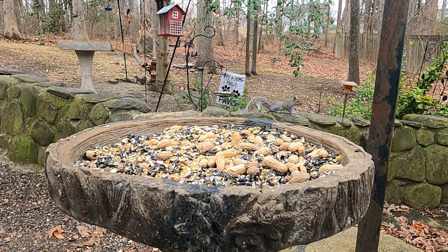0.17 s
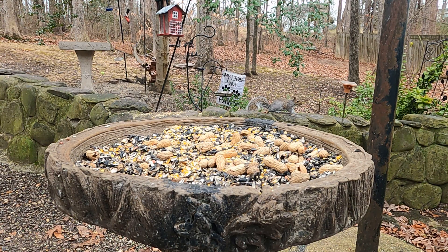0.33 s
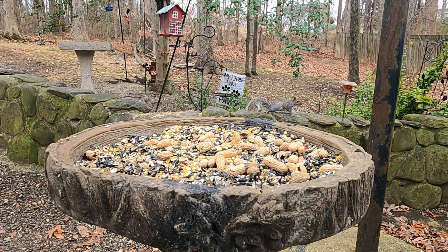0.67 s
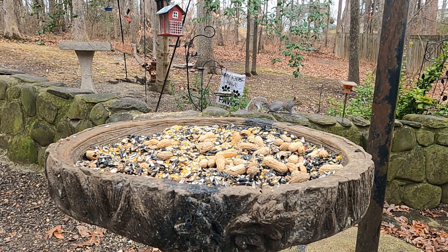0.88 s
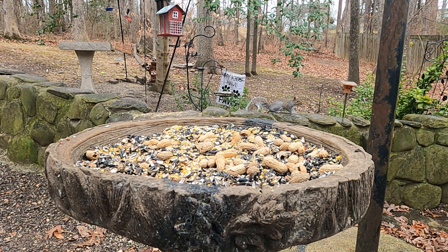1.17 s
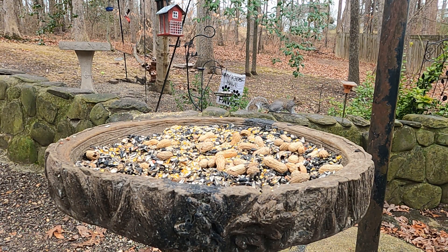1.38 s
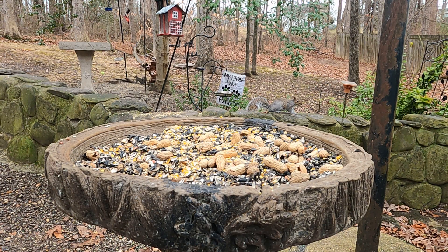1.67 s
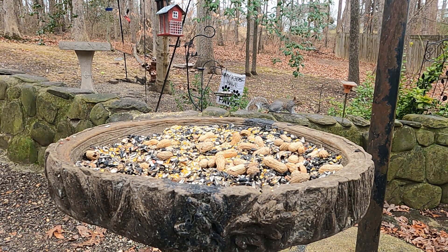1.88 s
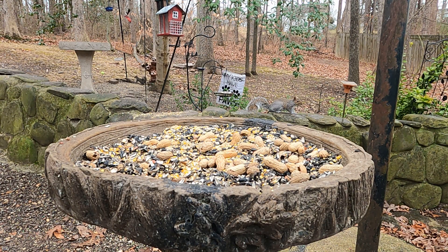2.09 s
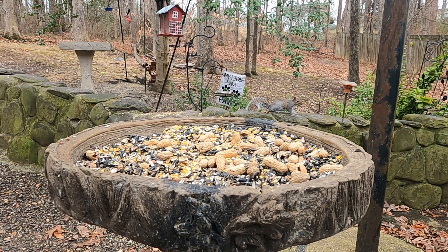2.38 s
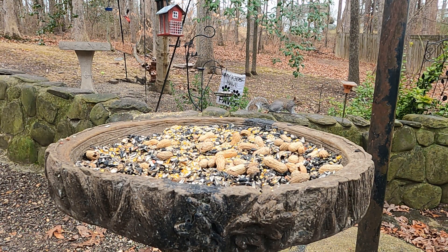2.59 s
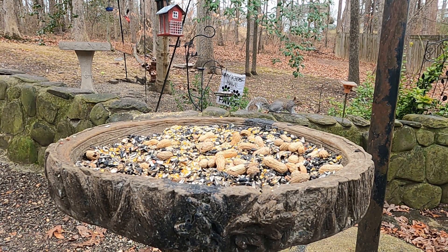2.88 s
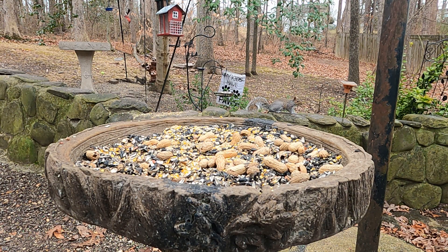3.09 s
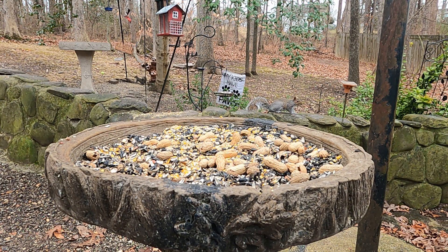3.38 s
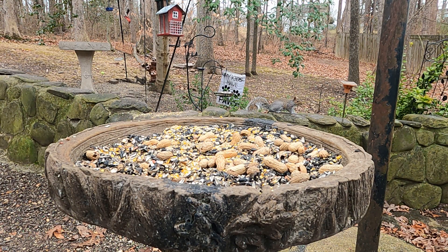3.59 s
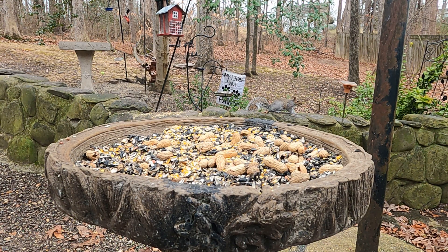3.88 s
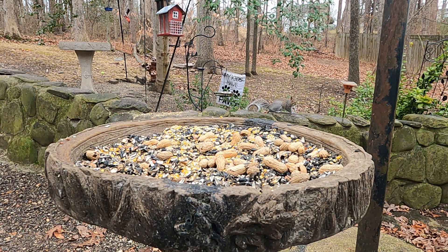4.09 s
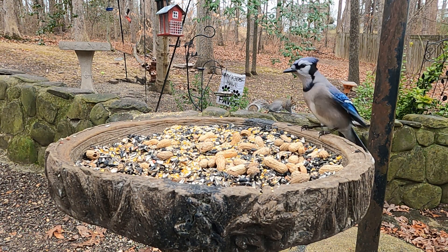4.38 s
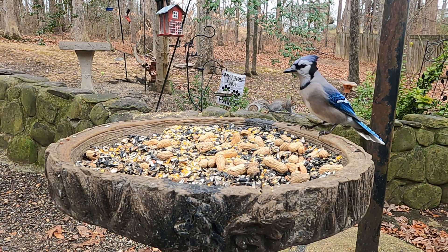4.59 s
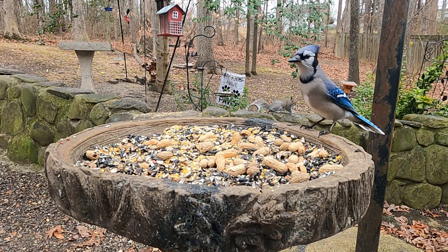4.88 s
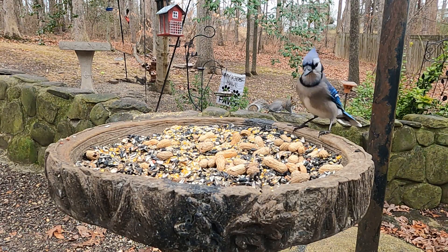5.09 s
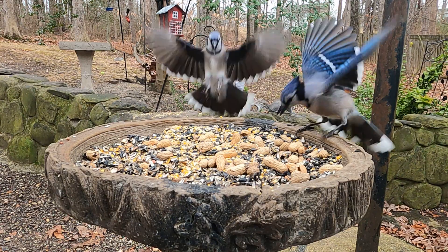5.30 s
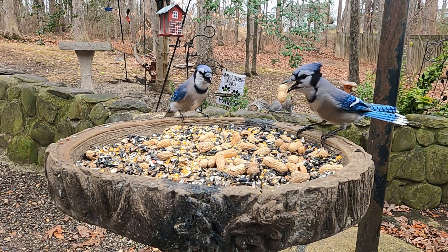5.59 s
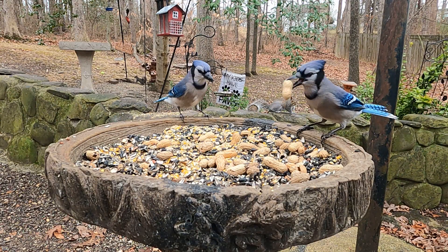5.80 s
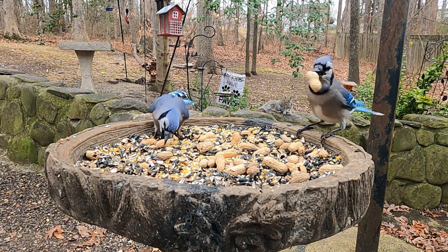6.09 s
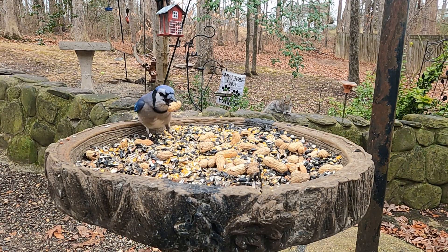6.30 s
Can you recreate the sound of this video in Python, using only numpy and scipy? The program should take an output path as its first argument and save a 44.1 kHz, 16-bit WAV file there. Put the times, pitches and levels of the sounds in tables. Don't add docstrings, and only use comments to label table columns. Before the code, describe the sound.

Low road rumble, far echoing harsh jay calls, soft knocks and claw ticks, then two loud near blue jay screams and a wing-flap departure.

```python
import sys
import numpy as np
from scipy import signal
from scipy.fft import rfft, irfft, next_fast_len
from scipy.io import wavfile
from scipy.ndimage import uniform_filter1d

SR = 44100
rng = np.random.default_rng(int(sys.argv[2]) if len(sys.argv) > 2 else 0)


def wav_out(sig):
    wavfile.write(sys.argv[1], SR, np.round(np.clip(np.atleast_2d(sig).T, -1, 1) * 32767).astype(np.int16))


def rack_gain(trim_db):
    fader = np.asarray(trim_db, float)
    return 10 ** (fader / 20)


N = 284381


def evened(x):
    return x / np.sqrt(np.mean(x ** 2) + 1e-20)


def read(points, hz):
    f, value = np.transpose(points)
    return np.interp(np.log(np.abs(hz) + 1), np.log(f + 1), value)


def wander(count, size):
    return evened(uniform_filter1d(uniform_filter1d(rng.standard_normal(count), size), size))


def coloured(x, points):
    size = next_fast_len(x.shape[-1], True)
    gain = rack_gain(read(points, np.fft.rfftfreq(size, 1 / SR)))
    return irfft(rfft(x, size) * gain, size)[..., :x.shape[-1]]


def add(mix, s, sound, pan_db=0., angle=0.):
    # (frequency [Hz], lead [rad])
    port_lead = [(0, 0.68), (3010, -0.81), (6120, -0.37), (7580, -0.98), (11700, -0.2), (12900, -0.2),
                 (13200, 0.2), (15200, -0.6)]
    x = np.pad(sound, (32, 32 + len(sound) % 2))
    turn = np.exp(.5j * angle * read(port_lead, np.fft.rfftfreq(len(x), 1 / SR)))
    pair = irfft(rfft(x) * np.array([turn, 1 / turn]), len(x))
    pair *= rack_gain(np.array([[pan_db], [-pan_db]]) / 2)
    part = mix[:, max(round(s * SR) - 32, 0):][:, :len(x)]
    part += pair[:, :part.shape[1]]


def woods(x, gap_s, depth=0.81, size=SR, stir=.4):
    # (frequency [Hz], t60 [s])
    trunk_decay = [(200, 1.5), (2000, 1.2), (3300, 0.91), (4500, 0.89), (7000, 0.74), (14000, 0.49)]
    taps_lr = np.zeros((2, size))
    at = np.arange(0, size - 20, 20) + rng.integers(0, 20, (2, (size - 1) // 20))
    np.put_along_axis(taps_lr, at, rng.choice([-1., 1.], at.shape), 1)
    taps_lr[1] = .5 * taps_lr[0] + 1.2 * taps_lr[1]
    hz, t, z = signal.stft(taps_lr, SR, nperseg=256)
    decay = rack_gain(-60 * t / depth / read(trunk_decay, hz)[:, None])
    tail = signal.istft(z * decay, SR, nperseg=256)[1]
    tail /= np.linalg.norm(tail, axis=1)[:, None]
    tail = np.pad(tail, ((0, 0), (round(gap_s * SR), 0)))
    stirred = x.mean(0) * (.92 + stir * wander(N, size=110))
    return signal.oaconvolve(stirred[None], tail, axes=1)[:, :N]


def traffic():
    # (frequency [Hz], density [dB per Hz])
    road_colour = [(12, -39), (24, -4.5), (50, 0.5), (80, -1), (124, -6), (160, -13), (484, -26.5),
                   (1390, -24.5), (2220, -34), (2550, -39), (2850, -41), (3460, -48.5), (4690, -55.5),
                   (7510, -55), (8160, -71.5), (10500, -76), (15000, -92)]
    # (frequency [Hz], left-right likeness [-1 to 1])
    likeness = [(60, 1), (180, 0.93), (550, 0.8), (1650, 0.78), (4970, 0.14), (15000, 0.99)]
    # (time [s], level [dB])
    swell = [(0.0, -54.5), (.6, -54), (1.2, -53.5), (4.4, -51.5), (5.25, -50.5), (5.55, -42.5), (5.9, -50),
             (6.45, -43.5)]
    hum_hz, hum_db = 119, -50.5
    rumble_db, gust_db = 7.5, 1.8
    truck_s, truck_db, truck_db_per_s = 1.1, 3.5, 2.1

    frames, hz = N // 512 + 5, np.fft.rfftfreq(2048, 1 / SR)
    a, b, c, d, patches = rng.standard_normal((frames, 1025, 5)).T
    patches = evened(uniform_filter1d(uniform_filter1d(patches, 20, 0), 8, 1))
    same = np.clip(read(likeness, hz), -1, 1)[:, None]
    left = a + 1j * b
    right = same * left + np.sqrt(1 - same ** 2) * (c + 1j * d)
    z = np.array([left, right]) * rack_gain(read(road_colour, hz)[:, None] + 1.72 * patches)
    road = signal.istft(z, nperseg=2048, noverlap=1536)[1][:, :N]

    t = np.arange(N) / SR
    hum = np.sin(2 * np.pi * np.cumsum(hum_hz + 2.13 * wander(N, size=2500)) / SR)
    hum *= rack_gain(hum_db + 3 * wander(N, size=3000))
    rumble = signal.filtfilt(*signal.butter(2, 150, fs=SR), road)
    drone = signal.filtfilt(*signal.butter(2, 450, fs=SR), road) - rumble
    truck = rack_gain(truck_db - truck_db_per_s * abs(t - truck_s)) - 1
    mixed = evened(road - rumble + truck * drone)
    mixed += rack_gain(rumble_db + gust_db * wander(N, size=6000)) * evened(rumble)
    return rack_gain(np.interp(t, *np.transpose(swell)) + 1.5) * mixed + hum


def bursts(rows):
    t = np.arange(0, N / SR, .001)
    gain = np.zeros(len(t))
    for s, rise, hold, fall, db in rows:
        climb = np.maximum((s + rise - t) / rise, 0)
        decay = np.maximum((t - s - rise - hold) / max(fall, .005), 0)
        gain += rack_gain(db - 20 * climb - 20 * decay) * (t >= s)
    return np.interp(np.arange(N) / SR, t, gain)


def rustle():
    # (start [s], rise [s], hold [s], time to fall 20 dB [s], level [dB])
    leaf_bursts = [(0.0, .02, .005, 1.2, -82.5), (.57, .04, .02, 10, -90.5),
                   (3.585, 0.013, 0.0092, 0.08, -73), (4.0, 0.048, 0.012, 0, -84),
                   (4.18, .01, 0.037, 1, -80.5), (4.2, 0.28, .01, 0.06, -68.5),
                   (4.35, 0.015, .008, 0.04, -72), (4.476, 0.0032, 0.0079, 0, -56.5),
                   (4.395, .02, 0.0069, -0.03, -68.5), (4.44, 0.017, 0.0056, -0.22, -77),
                   (4.8, 0.045, 0.27, -0.3, -79.5), (5.1, 0.047, 0.021, 1.2, -76.5),
                   (6.249, 0.0028, .006, 0, -48.5), (6.27, .01, 0.27, 2, -60.5)]
    # (start [s], rise [s], hold [s], time to fall 20 dB [s], level [dB])
    wing_draughts = [
        (5.22, 0.15, 0.1, 0.35, -25.5),
        (6.22, 0.18, .05, .1, -28.5),
    ]
    # (frequency [Hz], density [dB per Hz])
    feather_colour = [(1180, -16.5), (2000, -7), (2600, -7.5), (2900, -9.5), (7080, -10), (11900, -22.5),
                      (15000, -34.5)]
    clumps = rack_gain(2.2 * wander(N, size=40) + 2.5 * wander(N, size=700))
    grains = rng.standard_normal((2, N)) * clumps
    grains[1] = 0.38 * grains[0] + 0.55 * grains[1]
    crackle = evened(coloured(grains, feather_colour))
    draught = signal.lfilter(*signal.butter(3, [22, 90], "band", fs=SR), rng.standard_normal(N))
    return rack_gain(9.5) * bursts(leaf_bursts) * crackle + bursts(wing_draughts) * evened(draught)


def small_birds():
    # (start [s], length [s], start pitch [Hz], end pitch [Hz], level [dB])
    chips = [(0.0, .03, 7950, 7750, -75), (0.14, 0.012, 5820, 7300, -51.5), (0.148, .012, 7900, 8700, -66),
             (0.299, 0.072, 7200, 7630, -67.5), (0.777, 0.0055, 8700, 7400, -60.5),
             (1.168, 0.13, 7240, 7600, -69), (1.277, 0.037, 1990, 2000, -54.5),
             (3.926, 0.061, 8500, 7760, -79), (4.018, 0.049, 1910, 1995, -66),
             (4.18, .1, 5900, 7830, -70.5), (4.63, 0.12, 2700, 2503, -61), (4.953, 0.11, 8600, 7180, -64.5)]
    waver = 0.022
    mix = np.zeros((2, N))
    for s, length, start_hz, end_hz, db in chips:
        u = np.linspace(0, 1, round(length * SR))
        glide = end_hz + (start_hz - end_hz) * (1 - u) ** 3.8
        hz = glide + waver * end_hz * wander(len(u), size=24)
        whistle = np.sin(2 * np.pi * np.cumsum(hz) / SR)
        add(mix, s, rack_gain(db) * whistle * np.sin(np.pi * u ** 0.87))
    return rack_gain(1.5) * mix + rack_gain(1.0) * woods(mix, 0.0018, stir=.8)


def taps():
    # (time [s], peak [dB], centre [Hz], ring t60 [s], left-right [dB])
    ticks = [(0.6194, -63, 4540, 0.035, 0.0), (0.7294, -69, 5660, 0.035, -6),
             (0.8275, -60.5, 7670, 0.032, 1.0), (0.9194, -74, 5600, 0.035, 0.5),
             (1.2311, -59.5, 7340, 0.038, 10), (3.597, -60, 6640, 0.032, -3), (3.7554, -58, 5760, 0.25, -1),
             (3.7878, -42, 4160, 0.041, -3), (4.0494, -71, 7520, 0.035, -1.5),
             (4.3814, -47, 4630, 0.038, -9.5), (4.4107, -45, 5950, 0.04, -6),
             (4.476, -44.5, 6100, 0.018, -9.5), (4.482, -45, 9000, .02, -4.5),
             (4.518, -51, 7000, 0.012, -1.5), (4.5808, -48.5, 8000, 0.012, -6),
             (4.8584, -60, 5900, 0.035, 0.5), (5.0994, -65, 7320, 0.032, 2),
             (5.5754, -24.5, 5980, 0.027, 0.5), (6.2535, -33.5, 6030, 0.045, -3),
             (6.2674, -49, 5480, 0.03, 1.0), (6.2783, -53, 7720, 0.036, -1.5),
             (6.3124, -37, 5470, 0.025, -2)]
    # (time [s], peak [dB], centre [Hz], ring t60 [s], left-right [dB])
    knocks = [(0.754, -37.5, 288, 0.063, 0), (0.753, -38, 1080, 0.02, 2), (0.826, -35, 720, 0.032, 2),
              (0.828, -39, 1190, 0.028, 2), (0.833, -35, 308, 0.053, 0), (1.094, -44, 904, 0.05, 7),
              (1.171, -41.5, 1000, 0.028, 17), (1.17, -37, 304, 0.027, 12), (1.182, -30.5, 151, 0.051, 3),
              (1.185, -31.5, 285, 0.068, -4), (2.009, -48.5, 1150, 0.04, 20), (2.012, -36, 384, 0.021, 4),
              (2.079, -35, 390, 0.04, 7), (2.088, -41.5, 508, 0.047, 6), (2.097, -36, 306, 0.041, 4.5),
              (2.142, -41, 703, 0.029, 15), (4.477, -42, 1200, 0.059, -3), (4.482, -45.5, 1880, 0.03, -1),
              (4.476, -42.5, 300, 0.07, 1), (4.622, -41, 281, 0.073, -1), (5.577, -29, 2010, 0.018, -3),
              (6.265, -33, 1296, 0.027, -1), (6.278, -33.5, 1096, 0.026, -4),
              (6.351, -28, 231, 0.059, -2.5), (6.356, -38, 400, 0.057, -1), (4.42, -41, 403, 0.055, -4)]
    # (frequency [Hz], level [dB], t60 [s])
    hook_modes = [(4463, -7, 0.36), (5600, -14, .06), (6480, 0, 0.2), (7500, -4, 0.18), (11700, -8, 0.17),
                  (12300, -9, 0.18), (13200, -10, .06)]
    hook_s, hook_db, hook_rattle = 3.788, -56, .6

    mix, t = np.zeros((2, N)), np.arange(4000) / SR
    rise = 1 - np.exp(-t / 0.00045)
    for s, db, hz, t60, pan_db in ticks:
        band = signal.butter(2, [hz / 2.7, min(hz * 1.7, .4 * SR)], "band", fs=SR)
        noise = rng.standard_normal(len(t)) * rise * rack_gain(-60 * t / max(t60, .005))
        burst = signal.lfilter(*band, noise)
        add(mix, s, rack_gain(db - 9.0) * burst / np.sqrt(np.mean(burst[:150] ** 2)), pan_db)

    for s, db, hz, t60, pan_db in knocks:
        decay = rack_gain(db - 60 * t / max(t60, .005))
        add(mix, s, decay * (1 - np.exp(-t * hz * 1.7)) * np.sin(2 * np.pi * hz * t), pan_db)

    t = np.arange(12000) / SR
    ring = sum(rack_gain(db - 60 * t / t60) * np.sin(2 * np.pi * hz * t) for hz, db, t60 in hook_modes)
    rattle = .85 + hook_rattle * wander(len(t), size=60)
    add(mix, hook_s, rack_gain(hook_db) * (1 - np.exp(-t / 0.0046)) * rattle * ring)
    near_echo = woods(mix, 0.0018, depth=0.18, size=SR // 3)
    return mix + rack_gain(-10.5) * woods(mix, 0.008) + rack_gain(-7.0) * near_echo


def mouth(t, hz, db, grip, beak, rough, edge_s, join_s=-1.):
    onset, close = np.exp((t[0] - t) / edge_s[0]), np.exp((t - t[-1]) / edge_s[1])
    joined = np.clip((t - t[0] - join_s) / .008 + .5, 0, 1)
    low_grip = np.linspace(*grip, len(t)) * joined
    opening = beak[1] - beak[0] * onset - beak[2] * close
    roughness = rough[1] + rough[0] * onset + rough[2] * close
    return np.transpose([t, hz, db, low_grip, opening, roughness])


def jay(rows, throat, scale=1, slip=None, flutter_hz=212.5, flutter=0., patchy_db=3., pipe_hz=0.,
        shut_s=0., close_s=0.0017, blur=0.):
    # (frequency [Hz], level [dB])
    shut_throat = [(500, -41.5), (800, -23), (1450, -13), (1800, -18), (2750, -3.5), (3250, -11),
                   (4050, -15), (4800, 2.5), (5600, -6), (6500, -7.5), (8000, -18), (10000, -18.5),
                   (14500, -32.5)]
    flutter_ref_hz = 4000
    blur_hz = 6320
    lean = 0.17

    s, *columns = np.transpose(rows)
    t = np.arange(s[0], s[-1], 1 / SR)
    hz, effort_db, grip, beak, rough = (np.interp(t, s, c) for c in columns)
    grip, rough = np.clip(grip, 0, 1), np.clip(rough, 0, 1)
    jitter = wander(len(t), size=40) + 0.55 * wander(len(t), size=700)
    high = scale * hz * (1 + 0.0714 * rough * jitter)
    low = high / 2
    if slip is not None:
        low = np.where(t > slip[0][0], np.interp(t, *np.transpose(slip)), low)
    m, n = np.mgrid[:9, :4].reshape(2, -1, 1)[:, 1:]
    lines = m * high + n * low

    colour_db = read(throat, np.where(lines > pipe_hz, lines / beak, lines))
    if shut_s:
        shut = np.exp(-((t - s[0]) / shut_s) ** 4) + np.exp(-((t - s[-1]) / close_s) ** 4)
        colour_db = shut * read(shut_throat, lines) + (1 - shut) * colour_db
    colour_db += patchy_db * wander(lines.shape, size=500)
    weight = grip ** n * np.where(m, 1, .35) * rack_gain(colour_db) * (lines < .36 * SR)

    beat = 2 * np.pi * np.cumsum(flutter_hz * (1 + 0.024 * wander(len(t), size=900))) / SR
    depth = flutter * np.minimum(lines / flutter_ref_hz, 1.5)
    smear = blur * (lines / blur_hz) ** 3 * wander(lines.shape, size=30) + lean * depth * np.sin(beat)
    phase = 2 * np.pi * np.cumsum(lines, 1) / SR + 0.28 * (2 * m + n) ** 2 + smear
    voiced = (weight * (1 + depth * np.cos(beat)) * np.cos(phase)).sum(0)
    voiced /= np.sqrt((weight ** 2).sum(0) / 2)
    voiced *= 1 + 1.1 * rough * wander(len(t), size=20)
    return s[0], rack_gain(effort_db) * voiced * signal.windows.tukey(len(t), 200 / len(t))


def call(row, scoop, rise_s, soft_db, fade_db, crest=0., crack=(0, 0), **shape):
    start, length, hz, db, sag = row
    t = np.arange(0, length, .001)
    onset = np.exp(-t / rise_s)
    flat = crack[1] / (1 + np.exp((t - crack[0]) / .003))
    pitch = hz * (1 - flat - scoop * onset - sag * (t / length - crest) ** 2)
    effort_db = db + soft_db * onset + fade_db * (t / length) ** 2
    return mouth(start + t, pitch, effort_db, **shape)


def far_jays():
    # (start [s], length [s], low voice [Hz], effort [dB], pitch sag [share])
    scolds = [
        (1.307, .229, 780, -36, .008),
        (1.5, 0.24, 775.7, -40, 0.0091),
        (1.745, .205, 775, -36.5, -.012),
        (1.93, 0.2, 783.7, -38, 0.041),
    ]
    stray = (1.93, .24, 850, -49, .13)
    replies = [
        (2.326, .215, 899, -37.5, .11),
        (2.856, .235, 908.4, -36, .19),
    ]
    breaks = [
        (2.537, 0.046, 769, -34, 0.028),
        (3.087, .04, 756, -37, 0.04),
    ]
    cluck = (2.678, .058, 890, -46, .02)
    trails = [
        (2.57, .29, 856, -56.5, .06),
        (3.12, .3, 860, -61, .04),
    ]
    # (flutter depth [share], start beak narrowing [share], beak opening [factor], fade [dB])
    manners = [
        (0.5, 0.094, 0.9, 0.5),
        (0.47, .01, 0.92, -4),
        (0.22, 0.2, 0.97, -5),
        (0.23, .01, 0.94, -10.5),
    ]
    rasp_each = [.07, .16, .085, .145]
    # (time after start [s], flatness [share of pitch])
    cracks = [
        (0.078, .018),
        (0.025, 0.0301),
    ]
    # (frequency [Hz], level [dB])
    group_throat = [(800, -54.5), (1550, -14.5), (2330, -2), (3100, 2), (3900, -11), (4900, -12.5),
                    (5800, 1.5), (6700, -11), (7600, -23), (8500, -19.5), (10000, -33.5), (12000, -27.5),
                    (13300, -31), (14300, -56)]
    answer_throat = [(900, -10), (1800, -20), (2700, -9), (3600, 1.5), (4500, -6.5), (5400, -16),
                     (7200, -9), (9000, -22), (11000, -35.5), (14000, -57.5)]

    group, answers = np.zeros((2, 2, N))
    for row, (flutter, shut, wide, fade_db), rasp in zip(scolds, manners, rasp_each):
        rows = call(row, scoop=0.02, rise_s=.009, soft_db=-15, fade_db=fade_db, grip=(.75, .95),
                    beak=(shut, wide, .01), rough=(-.01, rasp, .06), edge_s=(.055, .05))
        voice = jay(rows, group_throat, scale=2, flutter=flutter, patchy_db=4.5, pipe_hz=4200, blur=.45)
        add(group, *voice, pan_db=4.5, angle=1.0)
    rows = call(stray, scoop=0.0697, rise_s=0.05, soft_db=1, fade_db=-8, grip=(.1, .12),
                beak=(-.15, .3, .01), rough=(-.05, .21, .01), edge_s=(.04, .04))
    add(group, *jay(rows, answer_throat, scale=2.0))

    sung = [call(row, scoop=0.0095, rise_s=0.016, soft_db=-24.5, fade_db=-0.5, crest=.3, crack=crack,
                 grip=(.33, .45), beak=(.05, .89, .01), rough=(.5, .065, .06), edge_s=(.009, .02))
            for row, crack in zip(replies, cracks)]
    sung += [call(row, scoop=-0.025, rise_s=0.0029, soft_db=3, fade_db=-34, grip=(.1, .11),
                  beak=(.02, .88, .02), rough=(.15, .09, .15), edge_s=(.006, .012)) for row in breaks]
    sung += [call(cluck, scoop=0.021, rise_s=0.0035, soft_db=-14, fade_db=-8, grip=(.1, .11),
                  beak=(.01, .48, .01), rough=(.01, .75, .01), edge_s=(.01, .01))]
    sung += [call(row, scoop=0.0058, rise_s=0.026, soft_db=7, fade_db=-15, grip=(.3, .31),
                  beak=(.01, .95, .01), rough=(.01, .12, .01), edge_s=(.01, .01)) for row in trails]
    for rows, shut_s in zip(sung, (0.025, .014, 0, 0.0017, 0, 0, 0)):
        voice = jay(rows, answer_throat, scale=2, flutter=0.055, shut_s=shut_s, blur=.06)
        add(answers, *voice, pan_db=-2.5, angle=0.98)

    group_tail = woods(group, .005, stir=0.45) * rack_gain(np.array([[-3.], [-5.]]))
    answer_tail = woods(answers, .008, stir=.42)
    return rack_gain(-5.5) * group + group_tail + rack_gain(-3.5) * answers + rack_gain(-6.5) * answer_tail


def scream(curve, rasps, jerks=(), **shape):
    slack_s, slack_share, slack_db = .032, 0.34, -18
    s, hz, db = np.transpose(curve)
    t = np.arange(s[0], s[-1] + slack_s, .001)
    slack = (np.maximum(t - s[-1], 0) / slack_s) ** 3
    jerk = sum(lift_hz * np.exp(-((t - at) / width) ** 2) for at, lift_hz, width in jerks)
    pitch = np.interp(t, s, hz) * (1 - slack_share * slack) + jerk
    rows = mouth(t, pitch, np.interp(t, s, db) + slack_db * slack, **shape)
    hoarse = uniform_filter1d(sum(rough * (t > a) * (t < b) for a, b, rough in rasps), size=8)
    return np.column_stack([rows[:, :-1], rows[:, -1] + hoarse])


def near_jays():
    # (time [s], high voice [Hz], effort [dB])
    first_curve = [(5.309, 1333, -9.5), (5.33, 1776, -1.5), (5.35, 1945, 1.5), (5.375, 1978, 4),
                   (5.42, 1869, 3.5), (5.5, 1863, 0.5), (5.545, 1733, -3), (5.63, 1697, -8),
                   (5.68, 1585, -12.5)]
    second_curve = [(5.527, 1328, -5.5), (5.55, 1867, -2), (5.567, 1962, -1), (5.6, 1997, -3),
                    (5.65, 1811, -1), (5.7, 1733, -2.5), (5.77, 1640, -1.5), (5.792, 1587, -2.5)]
    # (time [s], low voice [Hz])
    slip_curve = [(5.745, 834), (5.756, 890), (5.77, 930.5), (5.8, 974), (5.815, 900), (5.826, 605)]
    # (time [s], pitch lift [Hz], width [s])
    head_tosses = [
        (5.432, 70, 0.0074),
        (5.508, 44, 0.0088),
        (5.527, -29, 0.01),
    ]
    # (frequency [Hz], level [dB])
    first_throat = [(500, -35), (780, -12), (950, -23.5), (1700, -28), (1870, -23.5), (1980, -15),
                    (2300, -14.5), (2800, -5.5), (3600, 2), (4300, 0), (5000, -16.5), (5800, -19.5),
                    (6800, -8), (7800, -15), (9500, -27.5), (12000, -29), (14500, -47.5), (15500, -58)]
    second_throat = [(500, -63), (950, -14), (1650, -19), (1850, -24), (2000, -10.5), (2300, -10),
                     (2700, -9), (3600, 1.5), (4300, -5.5), (5400, -19), (6800, -9.5), (7900, -20.5),
                     (9500, -30), (14500, -38), (15500, -61)]

    mix = np.zeros((2, N))
    first = scream(first_curve, [(5.505, 5.545, 0.077), (5.66, 5.695, 0.22)], head_tosses,
                   grip=(.35, .75), join_s=0.029, beak=(-.03, .99, .2), rough=(.13, .008, .25),
                   edge_s=(.022, .022))
    second = scream(second_curve, [(5.75, 5.83, .14), (5.573, 5.582, 0.083)],
                    grip=(.4, .75), join_s=0.039, beak=(.03, .99, .1), rough=(.08, .008, .25),
                    edge_s=(.03, .008))
    voice = jay(first, first_throat, patchy_db=2.0, pipe_hz=3900, shut_s=.024, close_s=0.016)
    add(mix, *voice, pan_db=-0.5, angle=0.88)
    voice = jay(second, second_throat, slip=slip_curve, patchy_db=1.06, shut_s=0.018, close_s=0.0033)
    add(mix, *voice, pan_db=-2.5, angle=0.89)
    trees = woods(mix, 0.04)
    stone = woods(mix, 0.0027, depth=.15, size=SR // 4, stir=.1)
    return mix + rack_gain(-31.5) * trees + rack_gain(-14.5) * stone


def scene():
    return traffic() + rustle() + small_birds() + taps() + far_jays() + near_jays()


def band_limit(x):
    return signal.sosfilt(signal.butter(12, 15590, fs=SR, output="sos"), x)


def record(dry):
    power = abs(uniform_filter1d((dry ** 2).mean(0), size=400))
    power_db = 10 * np.log10(power + 1e-12)
    release_db = np.arange(N) * 9.3 / SR
    held_db = np.maximum.accumulate(power_db + release_db) - release_db
    over_db = np.maximum(held_db + 24, 0)
    ducked = dry / rack_gain(0.6 * uniform_filter1d(over_db, size=300))
    ducked = signal.lfilter(*signal.butter(2, 13500, fs=SR), ducked)
    ceiling = 0.93
    return band_limit(ceiling * np.tanh(ducked / ceiling))


dry = scene()
out = record(dry)
wav_out(out)
```